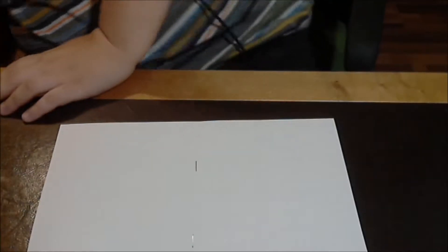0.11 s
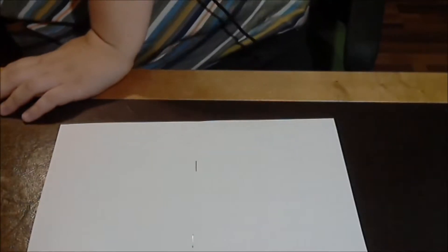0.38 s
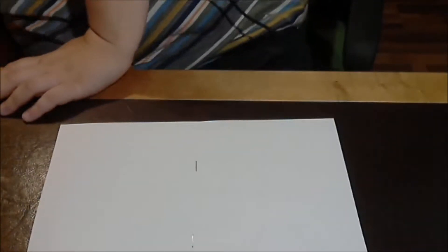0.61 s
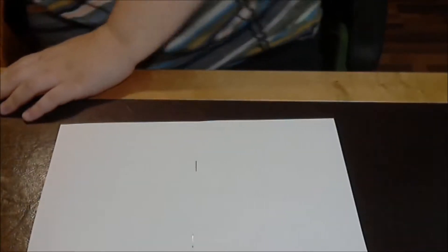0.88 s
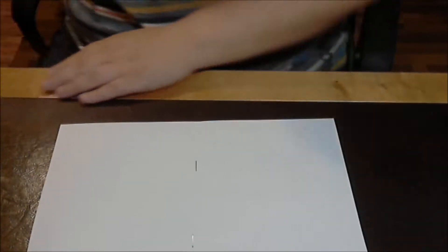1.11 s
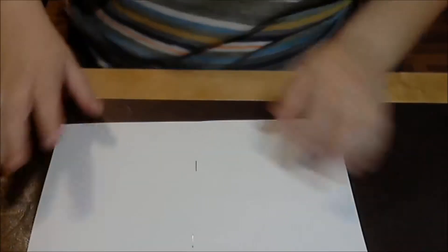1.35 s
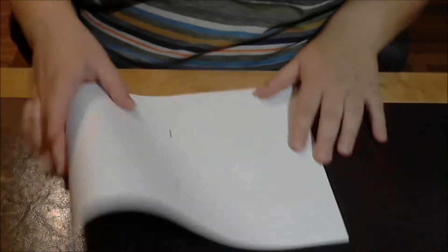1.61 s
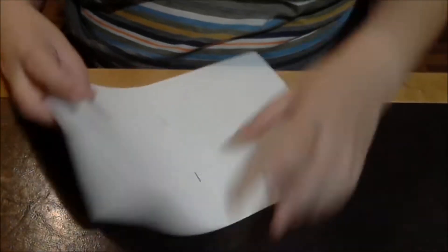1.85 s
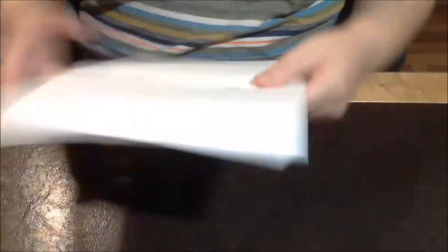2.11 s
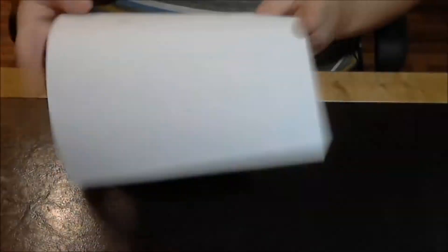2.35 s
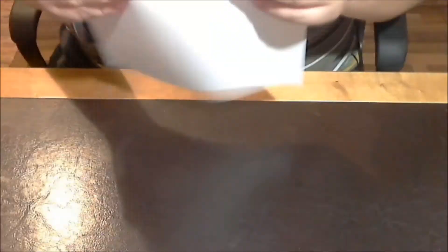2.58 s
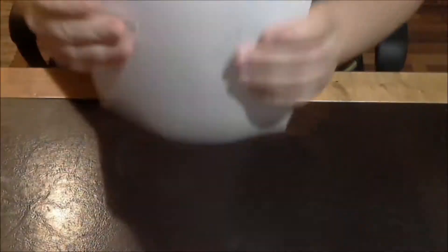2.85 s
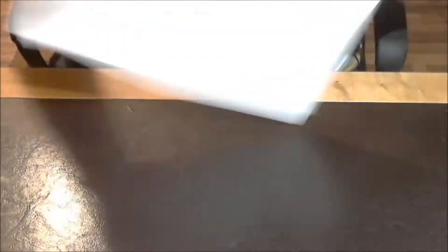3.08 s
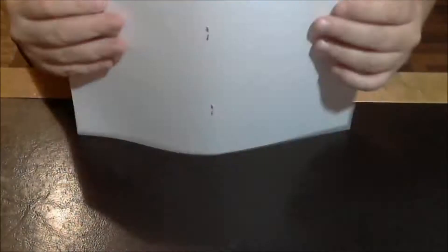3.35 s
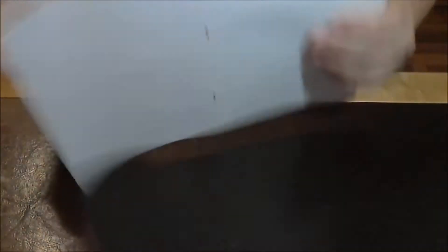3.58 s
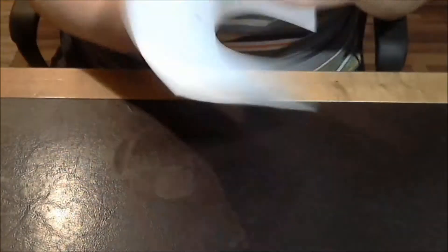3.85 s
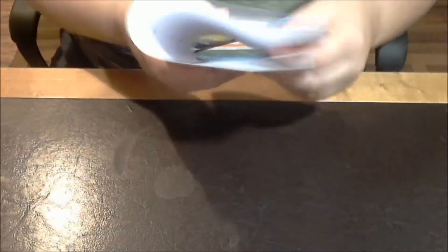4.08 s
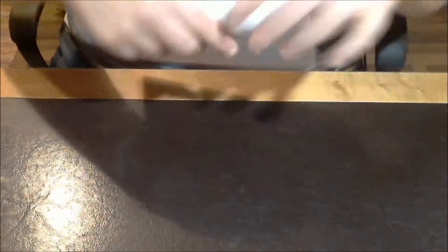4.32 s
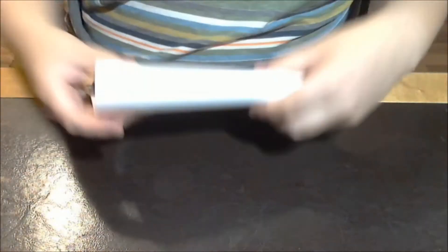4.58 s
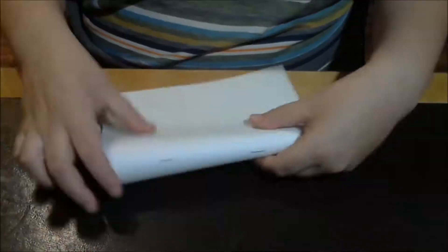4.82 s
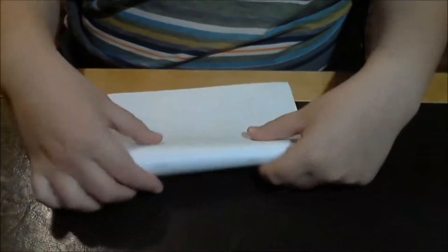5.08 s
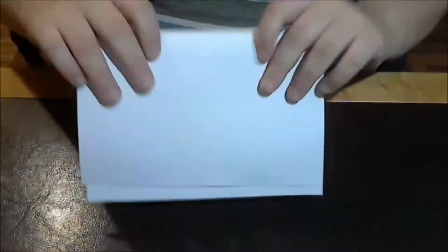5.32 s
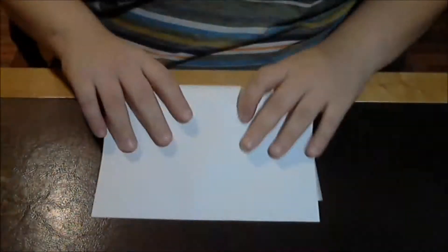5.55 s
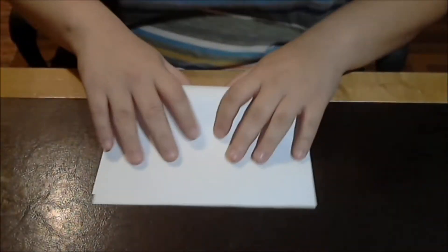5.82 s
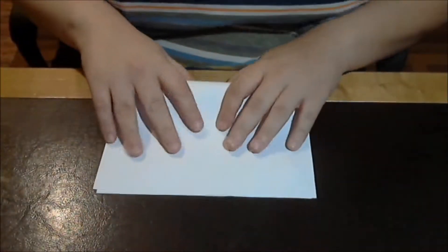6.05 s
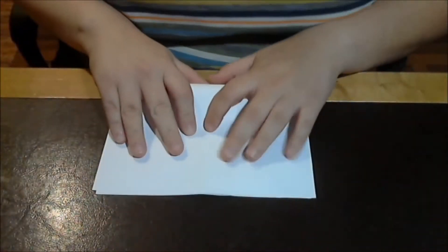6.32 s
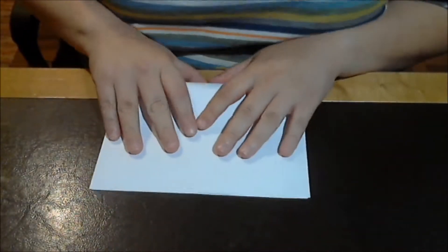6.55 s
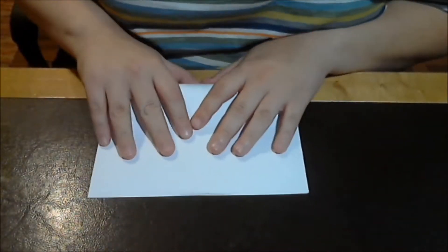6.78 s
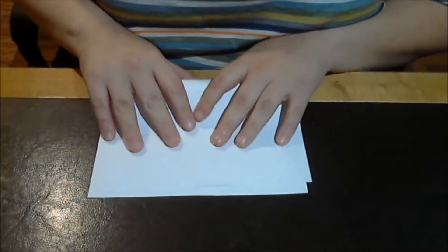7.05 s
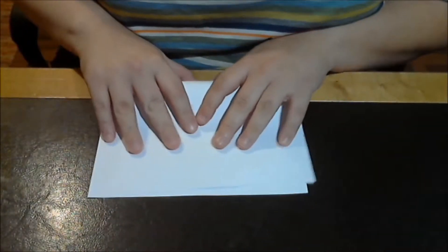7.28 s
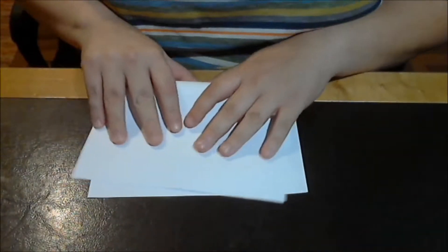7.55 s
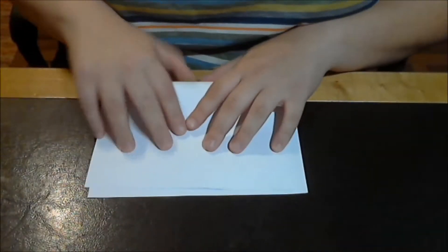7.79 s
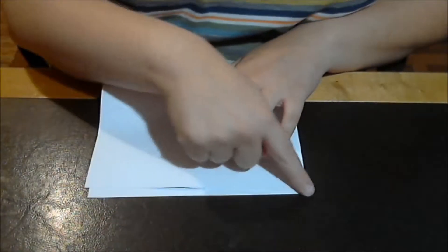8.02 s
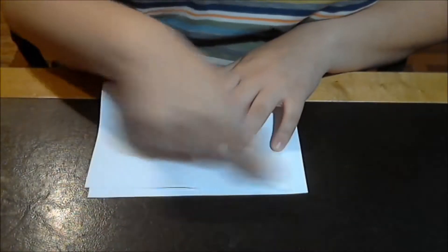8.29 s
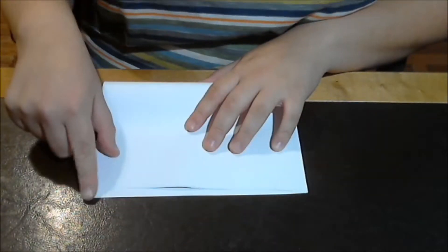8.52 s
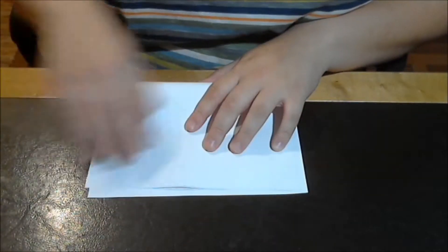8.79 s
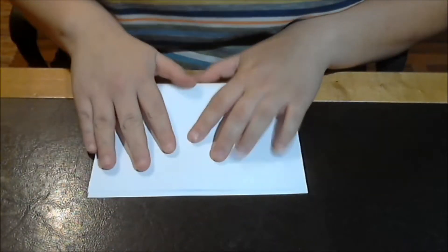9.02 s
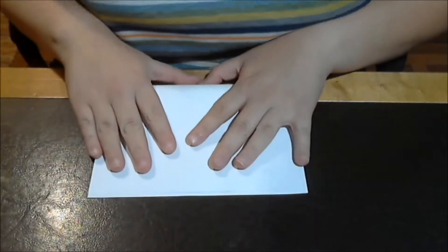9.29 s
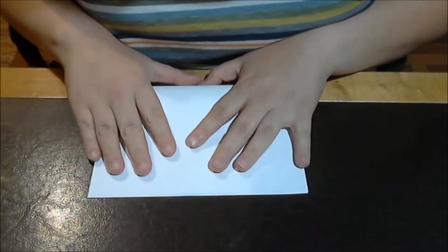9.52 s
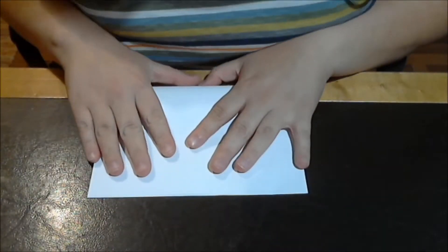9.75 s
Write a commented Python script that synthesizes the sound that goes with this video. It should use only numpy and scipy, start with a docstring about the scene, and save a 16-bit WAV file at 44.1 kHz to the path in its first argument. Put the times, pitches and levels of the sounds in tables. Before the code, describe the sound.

Very close to a small, bass-light microphone, a thin stack of paper pops sharply, pauses, then is lifted and flexed with dense dull crackles, snaps and papery flaps. Edges tap and slide as it is folded on a desk, with one hard snap midway. Short soft rubs follow, growing fainter as hands press the sheets flat. A barely audible fan hums in a dry room.

```python
"""A small fan hums near a close microphone: a few wavering tones over flickering air noise.
Then a thin stapled stack of paper is lifted, flexed, knocked on its edge, slid and pressed flat on a desk.
Bending sheets crackle dully and sliding ones rub on desk and skin: coloured noise that follows the hands.
Creases and edges snap as short filtered clicks, and soft bumps make the desk top ring."""
import sys
import numpy as np
from scipy import signal
from scipy.io import wavfile
from scipy.ndimage import uniform_filter1d

SR = 44100
rng = np.random.default_rng(int(sys.argv[2]) if len(sys.argv) > 2 else 0)


def to_wav(sig):
    """Store sig (one row per channel, or 1-D mono) as 16-bit WAV at the path in sys.argv[1].

    Samples outside -1..1 are clipped; the rate is SR.
    """
    pcm = np.clip(np.atleast_2d(sig), -1, 1) * 32767
    pcm = np.round(pcm).astype(np.int16)
    wavfile.write(sys.argv[1], SR, pcm.T)  # frames by channels


N = 436149  # samples, 9.89 s

# steady tones of the fan: (pitch [Hz], level [dB rms])
FAN_TONES = [(242.2, -84.5), (366.1, -76.5), (1077, -88.5), (1723, -87.5), (1938, -89.5), (2153, -93)]
# colour of the fan's air noise, only its shape counts: (frequency [Hz], level per Hz [dB])
AIR_COLOUR = [(35, -70), (60, -37), (135, -28), (217, -2), (308, -9.5), (363, -1.5), (492, -9.5),
              (1740, -15), (7060, -31), (13300, -24.5), (16000, -25)]
AIR_DB = -71.5
# faint rustle of the handled sheets between the movements: (time [s], level [dB])
RUSTLE_LEVEL = [(0, -91), (1.35, -84), (1.5, -67), (1.6, -54), (1.92, -45), (1.98, -64), (2.6, -61.5),
                (2.85, -72), (3.05, -71), (3.3, -52), (3.55, -69), (4.3, -70), (4.7, -64), (5.1, -68.5),
                (5.5, -64), (6.0, -68.5), (6.6, -76), (7.9, -86), (9.89, -92.5)]
# the stack bends and buckles: (start [s], length [s], level [dB])
BEND_MOVES = [(0.153, 0.059, -25.5), (0.183, 0.032, -20.5), (0.208, 0.038, -32.5), (0.337, 0.024, -41.5),
              (0.633, 0.059, -39.5), (0.702, 0.1, -41.5), (0.77, 0.029, -43), (0.813, 0.082, -55),
              (1.837, 0.048, -45.5), (2.018, 0.075, -34), (2.097, 0.025, -43.5), (2.159, 0.073, -42),
              (2.349, 0.055, -42.5), (2.446, 0.091, -47.5), (2.522, 0.085, -35.5), (2.612, 0.044, -36),
              (2.668, 0.065, -35), (2.784, 0.02, -22), (2.907, 0.033, -51.5), (2.953, 0.028, -44),
              (3.048, 0.052, -44.5), (3.101, 0.094, -36.5), (3.168, 0.053, -31.5), (3.225, 0.053, -31.5),
              (3.299, 0.088, -44.5), (3.389, 0.069, -38.5), (3.496, 0.052, -60.5), (3.588, 0.032, -48),
              (3.646, 0.032, -38.5), (3.752, 0.028, -38.5), (3.789, 0.04, -51), (3.871, 0.028, -61),
              (3.986, 0.028, -51), (4.079, 0.037, -39), (4.201, 0.041, -52.5), (4.312, 0.025, -58.5),
              (4.346, 0.023, -48), (4.402, 0.077, -48.5), (4.812, 0.067, -48.5), (5.283, 0.019, -37),
              (5.336, 0.033, -49.5), (5.448, 0.066, -47), (5.559, 0.026, -45), (6.471, 0.045, -59),
              (7.905, 0.013, -52), (9.044, 0.018, -58.5), (9.152, 0.023, -63.5)]
# sheets slide on desk, fingers or each other:
# (start [s], length [s], level [dB], pitch [Hz], hiss relative to the slide [dB])
SLIDE_MOVES = [(0.153, 0.038, -34, 1500, -10.5), (0.192, 0.03, -27, 1500, -11),
               (0.269, 0.028, -60, 2420.0, -25), (0.335, 0.03, -46.5, 1760.0, -4),
               (0.377, 0.021, -45.5, 4360.0, 10.5), (0.485, 0.018, -62, 4150.0, -2),
               (0.53, 0.017, -59.5, 4100.0, 6.0), (0.561, 0.028, -57.5, 4130.0, 4.5),
               (0.62, 0.07, -42.5, 2500, 3.5), (0.708, 0.051, -48, 1507, -1.5),
               (0.739, 0.06, -60, 1500.0, 13.5), (0.83, 0.045, -41.5, 3505, 2.5),
               (1.057, 0.049, -71, 3250, -4), (1.205, 0.05, -65, 2272, -16),
               (1.445, 0.15, -66.5, 3955, 8.5), (1.567, 0.042, -49, 3130.0, -1),
               (1.606, 0.031, -38.5, 2867, -6), (1.669, 0.052, -41, 2964, -3),
               (1.758, 0.038, -39, 3247, -1), (1.838, 0.034, -35, 4508, -2.5),
               (1.872, 0.074, -45, 3527, 0.5), (2.017, 0.072, -37, 1875, -20.5),
               (2.186, 0.04, -35.5, 2209, -13), (2.308, 0.03, -57.5, 1611, 9.5),
               (2.342, 0.062, -44.5, 1610.0, -8), (2.471, 0.068, -52, 1462, -4.5),
               (2.522, 0.085, -37.5, 2600, -13.5), (2.61, 0.031, -28.5, 3018, -13.5),
               (2.673, 0.057, -37, 2030.0, -21.5), (2.785, 0.018, -25.5, 3027, -11.5),
               (2.902, 0.024, -47, 2223, -22), (2.954, 0.017, -61.5, 1600.0, 11),
               (3.047, 0.057, -49, 1661, -24.5), (3.121, 0.06, -52, 1741, -29.5),
               (3.165, 0.073, -30, 1720.0, -15.5), (3.225, 0.055, -30.5, 2700, -20.5),
               (3.349, 0.15, -47, 3360, -5.5), (3.582, 0.043, -51, 1868, -23),
               (3.648, 0.022, -36, 1900, -20.5), (3.752, 0.024, -36.5, 2200, -16),
               (3.8, 0.04, -45.5, 2600, -3), (3.882, 0.036, -47.5, 2191, 2.5),
               (3.928, 0.04, -53.5, 2043, 5.5), (3.974, 0.032, -48, 1850, -26.5),
               (4.079, 0.042, -36, 1995, -7.5), (4.167, 0.067, -62, 2480.0, 14),
               (4.349, 0.03, -50, 2155, -16.5), (4.401, 0.078, -52.5, 1564, 2.5),
               (4.467, 0.08, -51, 4800, 8), (4.6, 0.015, -51, 2200, -12), (4.691, 0.052, -55, 2450, -17.5),
               (4.776, 0.041, -44, 2400, -12.5), (4.839, 0.038, -33, 2012, -29.5),
               (4.941, 0.019, -59.5, 1700.0, -7.5), (5.038, 0.03, -62, 2300.0, -7.5),
               (5.142, 0.032, -57.5, 3100.0, -2.5), (5.17, 0.059, -45, 2627, -12.5),
               (5.208, 0.069, -33.5, 2659, -10), (5.284, 0.032, -48, 2060.0, -14.5),
               (5.393, 0.032, -66.5, 4100.0, 5), (5.454, 0.069, -45.5, 1654, -16),
               (5.562, 0.026, -43, 2160, -15.5), (5.631, 0.03, -58, 1750, -8),
               (5.706, 0.026, -31.5, 1742, -13.5), (5.82, 0.048, -56.5, 1948, -5.5),
               (5.889, 0.055, -44.5, 1904, -15.5), (5.953, 0.06, -67, 1906, -8.5),
               (6.124, 0.026, -62.5, 1983, -1), (6.193, 0.026, -65, 2120, -3.5),
               (6.221, 0.032, -49, 2371, -8.5), (6.245, 0.04, -55.5, 2300, -11),
               (6.314, 0.032, -49, 2202, -23.5), (6.422, 0.031, -64.5, 2530.0, -6.5),
               (6.465, 0.043, -50, 1744, -11), (6.705, 0.027, -65, 1607, -9),
               (6.74, 0.048, -59, 3070.0, 1.5), (6.827, 0.032, -55, 2028, -13),
               (6.859, 0.098, -48.5, 1747, -11.5), (6.995, 0.078, -42.5, 1794, -8.5),
               (7.107, 0.036, -45.5, 2080.0, -2.5), (7.175, 0.021, -55, 1980.0, -4),
               (7.286, 0.206, -48, 2378, -1), (7.607, 0.076, -46, 2554, -0.5),
               (7.755, 0.061, -48, 2424, -2.5), (7.823, 0.041, -53, 2230, -7.5),
               (7.906, 0.042, -70.5, 1400.0, -0.5), (7.985, 0.048, -68.5, 2873, -6.5),
               (8.09, 0.031, -72, 4700, -4.5), (8.156, 0.019, -71.5, 4800, 2.5),
               (8.23, 0.02, -76, 4700, -8.5), (8.262, 0.012, -72.5, 2500, -1),
               (8.465, 0.028, -61.5, 2600.0, -9.5), (8.499, 0.057, -60, 3300, -9.5),
               (8.573, 0.06, -58.5, 3600, -0.5), (8.65, 0.032, -62, 3800, -0.5),
               (8.702, 0.03, -62.5, 4200, -3.5), (8.832, 0.054, -52, 2008, -4.5),
               (8.927, 0.026, -62, 3018, 3), (8.983, 0.04, -55, 2000.0, -6.5),
               (9.054, 0.022, -63.5, 1983, -4.5), (9.069, 0.05, -61, 3500.0, 4),
               (9.149, 0.022, -67, 1600.0, -10.5), (9.285, 0.046, -55, 1828, -10.5),
               (9.366, 0.025, -57, 1541, -12.5), (9.437, 0.02, -68.5, 1500.0, -12),
               (9.485, 0.04, -69.5, 1700.0, -12.5), (9.632, 0.042, -69.5, 1400.0, -10.5),
               (9.723, 0.028, -68.5, 1500, -1.5)]
# skin brushes over a face or edge of the sheet, hiss alone: (start [s], length [s], level [dB])
BRUSH_MOVES = [(0.188, 0.03563, -32), (0.665, 0.03, -38), (2.01, 0.037, -47), (2.227, 0.059, -49),
               (2.401, 0.022, -47), (2.641, 0.026, -51), (3.075, 0.044, -65), (3.427, 0.083, -47),
               (3.537, 0.041, -63.5), (3.854, 0.04, -57.5), (4.019, 0.058, -58.5), (4.238, 0.056, -61),
               (4.38, 0.022, -49.5), (4.564, 0.035, -61), (4.628, 0.025, -59.5), (4.878, 0.07, -63.5),
               (6.328, 0.042, -63.5), (9.009, 0.034, -58)]
# where the buckling sounds strongest, low while the stack lies under the hand: (time [s], pitch [Hz])
BUCKLE_PITCH_PATH = [(0, 1049), (0.6, 792), (0.95, 597.6), (1.902, 1225), (2.6, 908), (3.301, 972),
                     (4.5, 1279), (9.89, 1203)]
# colours of the three rubbing layers, only their shape counts: (frequency [Hz], level per Hz [dB])
BUCKLE_COLOUR = [(210, -21), (400, -5), (700, -6.5), (1000, -6.5), (1300, -1.5), (1700, -19.5),
                 (3000, -26.5)]
SLIDE_COLOUR = [(800, -36.5), (1100, -8), (1400, 5), (2200, 4.5), (3300, 1), (4500, 5), (5800, -2.5),
                (8000, -28)]
HISS_COLOUR = [(3500, -17), (5500, -8.5), (8000, -7.5), (11000, -3.5), (13500, 1), (16500, -15)]
# snaps and knocks of the sheets: (time [s], peak of the body [dB], pitch [Hz], treble relative to that peak [dB])
SNAP_EVENTS = [(0.102, -55, 3220, -22), (0.191, -11.5, 1110, -28.5), (0.197, -9, 1260, -19),
               (0.633, -25, 1350, -6.5), (0.647, -28, 760, -24), (0.708, -31.5, 1300, -17),
               (0.714, -22.5, 1360, -13.5), (0.757, -32, 714, -28.5), (0.791, -45, 1350, -31.5),
               (0.82, -39.5, 710, -26), (0.881, -37, 730, -29.5), (0.935, -51.5, 510, -25),
               (1.456, -47.5, 1810, -12), (1.565, -34, 3470, -1), (1.615, -22, 2350, -12.5),
               (1.855, -5.5, 4400, -0.5), (1.887, -22.5, 4700, -11.5), (2.032, -17, 2380, -19.5),
               (2.068, -19, 1310, -23), (2.166, -29, 1400, -18), (2.197, -27.5, 1280, -22),
               (2.211, -18.5, 1400, -21.5), (2.357, -22, 1360, -23), (2.468, -29.5, 1180, -16),
               (2.536, -24, 1210, -23.5), (2.56, -19.5, 940, -22), (2.583, -18.5, 1840, -19.5),
               (2.616, -11, 3050, -21), (2.634, -22.5, 2060, -22.5), (2.68, -25, 3380, -30),
               (2.697, -10.5, 2100, -12.5), (2.779, -7, 4150, -18), (2.782, -6, 2930, -24),
               (2.789, -2.5, 3000, -26.5), (2.841, -32, 940, -31), (2.905, -23.5, 2050, -25),
               (2.92, -34.5, 1890, -30), (2.959, -33.5, 910, -8.5), (3.0, -49.5, 3000, -8),
               (3.068, -29, 1070, -29.5), (3.127, -25, 1280, -29), (3.15, -26, 2180, -22.5),
               (3.16, -20.5, 1010, -25.5), (3.174, -14.5, 1350, -30), (3.187, -12, 1580, -21),
               (3.205, -18, 1420, -24), (3.23, -18, 1240, -23.5), (3.24, -21, 2030, -22),
               (3.265, -16.5, 1300, -35), (3.267, -21, 2640, -27), (3.377, -29, 3300, -18),
               (3.402, -23, 1220, -22), (3.426, -22.5, 1260, -19), (3.447, -26, 3050, -12),
               (3.628, -29.5, 1510, -22), (3.656, -17.5, 1830, -19.5), (3.761, -20.5, 1990, -29),
               (3.983, -24, 1430, -26), (4.08, -29, 2020, -22.5), (4.092, -21, 1940, -14),
               (4.109, -21, 1770, -21.5), (4.148, -24, 1900, -19.5), (4.206, -32, 2390, 0),
               (4.349, -19.5, 1830, -31), (4.409, -25, 1400, -16), (4.528, -39, 1770, -20),
               (4.606, -32, 1400, -30), (4.796, -32, 2380, -14.5), (4.817, -23, 1640, -25.5),
               (4.946, -41, 1300, -24.5), (4.856, -20.5, 1980, -28.5), (5.29, -16, 3200, -17.5),
               (5.313, -14, 1600, -12.5), (5.457, -32, 1640, -16.5), (5.563, -18.5, 1930, -31.5),
               (5.703, -3.5, 1910, -8.5), (5.848, -44, 1880, -26), (5.883, -34, 1900, -21.5),
               (5.915, -55, 1860, -16), (6.223, -24, 2290, -23), (6.325, -38, 2030, -28),
               (6.701, -47.5, 1490, -22), (7.787, -29.5, 2400, -2.5), (7.796, -28, 2100, -7),
               (7.84, -19.5, 2210, -4.5), (8.979, -31, 2050, -20.5), (8.99, -36, 2000, -16),
               (9.048, -27, 1810, -25)]
# dull bumps of hands and stack on the desk: (time [s], relative strength [dB])
BUMP_EVENTS = [(0.164, -48), (0.48, -64), (0.635, -43.5), (1.454, -55.5), (2.557, -42), (2.782, -45),
               (3.168, -44.5)]
# ringing modes of the desk top: (pitch [Hz], relative level [dB], time to fall by 60 dB [s])
DESK_MODES = [(200, -7, .04), (294.7, 13, 0.021), (399, 2, 0.038)]

# what rustle and slides pass on to the other layers
RUSTLE_BUCKLE_DB, RUSTLE_HISS_DB, SLIDE_BUCKLE_DB = -17, -5, -25
# (attack [dB per s], release [dB per s]) around the held part of a movement
BEND_SLOPES, SLIDE_SLOPES, HISS_SLOPES = (2800, 960), (4600, 770), (4400, 500)
ARCH_DB, ARCH_S = 7.5, .035  # a hold is this much quieter at its ends and swells or fades within ARCH_S
SLIDE_RING_OCTAVES, SLIP_SPREAD_DB = .4, 3.5  # width of a sliding sheet's ring; unevenness of the slips
FALL_ABOVE = .3  # above its centre a ring falls by this share of its lift per octave
GLIDE_S = 0.015  # the pitch glides from one slide to the next
SNAP_RISE_S = .0004
THUMP_DB, THUMP_HZ = -15.5, 300  # push of air under each snap: level for a snap at THUMP_HZ; upper edge


def from_db(db):
    """Decibels to gain."""
    return 10 ** (np.asarray(db) / 20)


def rms_one(x):
    """Scale to unit rms."""
    return x / np.sqrt(np.mean(x ** 2) + 1e-20)


def drift(rate):
    """Slow chance of spread 1, changing about rate times a second."""
    r = np.exp(-80 * np.pi * rate / SR)  # one step is 40 samples
    noise = rng.standard_normal(N // 40 + 2002)
    slow = signal.lfilter([1], [1, -2 * r, r * r], noise)[2000:]  # skip the filter's settling
    return np.interp(np.arange(N) / 40, np.arange(len(slow)), rms_one(slow))


def band(x, low_hz, high_hz, order=2):
    """Butterworth band-pass: keep what lies between two frequencies."""
    edges = np.clip([low_hz, high_hz], 20, .45 * SR)
    return signal.sosfilt(signal.butter(order, edges, "band", fs=SR, output="sos"), x)


def coloured(sources, spectrum, patchy_db, patch_rate, centre_hz=None, lift_db=0, octaves=1, count=3):
    """Narrow bands, count to the octave, fed by two unrelated sources in turn, each with its own flicker.
    Bands near a moving centre are lifted at the cost of the others; rms 1."""
    hz, db = np.transpose(spectrum)
    edges = np.geomspace(hz[0], hz[-1], round(count * np.log2(hz[-1] / hz[0])) + 1)
    out, power = 0, 0
    for k, (low, high) in enumerate(zip(edges, edges[1:])):
        level_db = np.interp(np.log(low * high) / 2, np.log(hz), db)
        if centre_hz is not None:
            above = np.log2(np.sqrt(low * high) / centre_hz)  # octaves
            ring = np.exp(-(above / octaves) ** 2) - FALL_ABOVE * np.maximum(above, 0)
            level_db = level_db + lift_db * ring
            # little sounds far below the centre
            level_db = level_db - 34 * np.maximum(np.log2(centre_hz / (1.595 * high)), 0)
        power = power + from_db(2 * level_db) * (high - low)
        gain = from_db(level_db + patchy_db * drift(patch_rate))
        out = out + gain * band(sources[k % 2], low, high, order=3)
    return rms_one(out / np.sqrt(power))


def fan():
    """Steady tones that waver a little over flickering air noise."""
    t = np.arange(N) / SR
    tones = np.zeros(N)
    for hz, level_db in FAN_TONES:
        gain = from_db(level_db + 1.5 * drift(2.7)) * np.sqrt(2)  # rms to peak
        tones += gain * np.sin(2 * np.pi * (hz * t + rng.random()))
    air = coloured(rng.standard_normal((2, N)), AIR_COLOUR, patchy_db=1.5, patch_rate=9.9)
    return tones + from_db(AIR_DB) * air


def movements(t, start, length, level_db, slopes):
    """Level in dB of each movement over time: attack, arched hold, release."""
    early, late = start[:, None] - t, t - (start + length)[:, None]
    ramp_s = np.minimum(length[:, None] / 2, ARCH_S)
    off_middle = np.clip(1 + np.maximum(early, late) / ramp_s, 0, 1) ** 2
    arched_db = level_db[:, None] - ARCH_DB * (off_middle - 1 / 3)
    return arched_db - slopes[0] * np.maximum(early, 0) - slopes[1] * np.maximum(late, 0)


def grains(per_s, spread_db, clump_db, rough):
    """Tiny slips come in clumps with uneven sizes; smooth friction noise makes up the rest."""
    born = rng.random(N) < per_s * from_db(clump_db * drift(40)) / SR
    sizes = from_db(spread_db * np.minimum(rng.exponential(1, N), 4)) * born
    slips = rms_one(sizes * rng.choice([-1, 1], (2, N)))
    return np.sqrt(rough) * slips + np.sqrt(1 - rough) * rng.standard_normal((2, N))


def rubbing(ease_s=0.0043):
    """Buckling crackle, sliding and hiss follow the hand movements; the strongest movement leads."""
    t, time_s = np.arange(0, N / SR, .001), np.arange(N) / SR  # coarse and full time
    bends, brushes = np.transpose(BEND_MOVES), np.transpose(BRUSH_MOVES)
    start, length, level_db, pitch_hz, hiss_over_db = np.transpose(SLIDE_MOVES)

    rustle_db = np.interp(t, *np.transpose(RUSTLE_LEVEL))
    slides = movements(t, start, length, level_db, SLIDE_SLOPES)
    slide_db = np.maximum(slides.max(axis=0), rustle_db)
    bend_db = movements(t, *bends, BEND_SLOPES).max(axis=0)
    buckle_db = np.max([bend_db, slide_db + SLIDE_BUCKLE_DB, rustle_db + RUSTLE_BUCKLE_DB], axis=0)
    slide_hiss_db = movements(t, start, length, level_db + hiss_over_db, HISS_SLOPES).max(axis=0)
    brush_db = movements(t, *brushes, HISS_SLOPES).max(axis=0)
    hiss_db = np.max([slide_hiss_db, brush_db, rustle_db + RUSTLE_HISS_DB], axis=0)

    starts = np.sort(np.r_[0, start, bends[0]])
    since = t - starts[np.clip(np.searchsorted(starts, t) - 1, 0, None)]  # s since the last start
    leader = slides.argmax(axis=0)
    glide_hz = uniform_filter1d(pitch_hz[leader], round(GLIDE_S * 1000))
    curves = (buckle_db, slide_db, glide_hz, hiss_db, since, -hiss_over_db[leader])
    buckle_db, slide_db, slide_hz, hiss_db, since, dullness_db = [
        uniform_filter1d(np.interp(time_s, t, curve), round(ease_s * SR)) for curve in curves]

    # a flexing stack crackles, a flat one glides
    rough = np.clip((buckle_db - slide_db + 22.0) / 18, .03, .9)
    # a lifted sheet rings at its pitch, a pressed one only hisses
    hollow = np.clip((dullness_db - 1.0) / 16, 0, 1)
    jerk = (rough + 0.24) * drift(70)  # creases give way unevenly and shake all three together
    patchy_db = 1.8 + 2.5 * rough  # a flat slide is even in colour
    spent_db = -60 * rough * hollow * np.minimum(since, .05)  # a bend crackles most as it begins

    buckle_hz = np.interp(time_s, *np.transpose(BUCKLE_PITCH_PATH))
    buckle = coloured(grains(600, 2.4, 5.4, rough), BUCKLE_COLOUR, 3.5, 60.0, buckle_hz, 5.9, 0.36)
    ring_db = 3.4 + 12.45 * hollow * (1 - .3 * rough)
    slide = coloured(grains(900, SLIP_SPREAD_DB, 5.5, rough), SLIDE_COLOUR, patchy_db, 25.0,
                     slide_hz, ring_db, SLIDE_RING_OCTAVES, count=5)
    hiss = coloured(grains(1500, SLIP_SPREAD_DB, 5.5, rough * hollow), HISS_COLOUR,
                    patchy_db=2.5, patch_rate=9.5, count=4)
    return (from_db(buckle_db + spent_db + 2.5 * jerk) * buckle
            + from_db(slide_db + spent_db + 1.9 * jerk) * slide
            + from_db(hiss_db + 3.0 * hollow * jerk) * hiss)


def snaps(t60=0.064):
    """A crease gives way or an edge lands: a short crack, then a flutter of the sheet dying around its pitch."""
    out, t = np.zeros(N + 3000), np.arange(3000) / SR
    noise = rng.standard_normal((len(SNAP_EVENTS), 3, 3000))
    rise, crack = 1 - np.exp(-t / SNAP_RISE_S), np.exp(-t / 0.0012)
    step = 4.8 * (t == 0)  # the first break is one clean pulse
    for (s, peak_db, hz, treble_db), (near, wide, high) in zip(SNAP_EVENTS, noise):
        dying = from_db(-60 * t / (t60 * (1500 / hz) ** 0.9))  # low flutter lasts longer
        flutter = rise * (crack + 0.5 * dying)
        body = band(step + near * flutter, hz / 1.257, hz * 1.247)
        body += 0.31 * band(step + wide * flutter, hz / 2.14, hz * 2.54, order=4)
        edge = band(step + high * rise * (crack + 0.3 * dying ** 2), 7200, 18000, order=3)
        thump = band(step, 40, THUMP_HZ, order=1)
        sound = body / np.abs(body).max()
        sound += from_db(treble_db) * edge / np.abs(edge).max()
        sound += from_db(THUMP_DB) * THUMP_HZ / hz * thump / thump.max()  # weaker under high snaps
        at = round(s * SR)
        out[at:at + len(t)] += from_db(peak_db) * sound
    return out[:N]


def bumps():
    """Soft contacts rattle for a moment and set the desk top's low modes ringing."""
    rows, out = np.array(BUMP_EVENTS), np.zeros(N)
    strengths = rng.normal(0, 2.5, (len(rows), len(DESK_MODES)))
    for (hz, level_db, t60), chance_db in zip(DESK_MODES, strengths.T):
        clicks = np.full(N, 1e-18)
        at = np.round(rows[:, 0] * SR).astype(int)
        clicks[at] = from_db(rows[:, 1] + level_db - 23.0 + chance_db)
        fading = signal.lfilter([1], [1, -np.exp(-1 / (0.029 * SR))], clicks)
        rattle = fading * rng.standard_normal(N)
        r, w = from_db(-60 / (t60 * SR)), 2 * np.pi * hz / SR  # decay and turn per sample
        out += signal.lfilter([0, np.sin(w)], [1, -2 * r * np.cos(w), r * r], rattle)
    return band(out, 160, 920, order=4)


def reflections(x, t60=0.024, level_db=-16):
    """Desk and near walls return a short diffuse tail: decaying noise that starts after 3 ms."""
    t = np.arange(round(.2 * SR)) / SR
    tail = rng.standard_normal(len(t)) * from_db(-60 * t / t60) * (t > .003)
    return from_db(level_db) * signal.fftconvolve(x, tail / np.sqrt(np.sum(tail ** 2)))[:N]


def scene():
    """Paper and desk with their reflections, over the fan."""
    paper = rubbing() + snaps() + bumps()
    return (paper + reflections(paper) + fan())[None]


def low_pass(x):
    """Removes everything above the highest recorded frequency."""
    return signal.sosfilt(signal.butter(12, 16250, fs=SR, output="sos"), x)


def record(dry, port_hz=13500, port_width_hz=1800, port_lift=0.37):
    """The small microphone loses the bass and rings at its port; peaks are rounded."""
    thin = signal.sosfilt(signal.butter(2, 120, "high", fs=SR, output="sos"), dry)
    port = band(thin, port_hz - port_width_hz / 2, port_hz + port_width_hz / 2, order=1)
    bright = thin + port_lift * port
    mix = 1.282 * np.tanh(bright / 1.38)
    return low_pass(mix)


dry = scene()
out = record(dry)
to_wav(out)
```